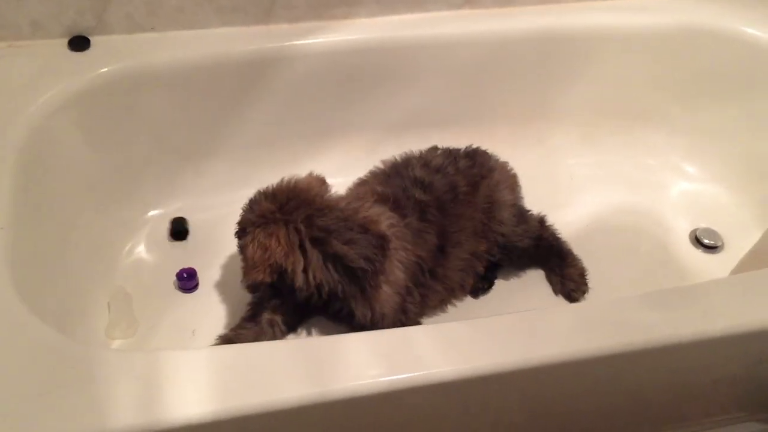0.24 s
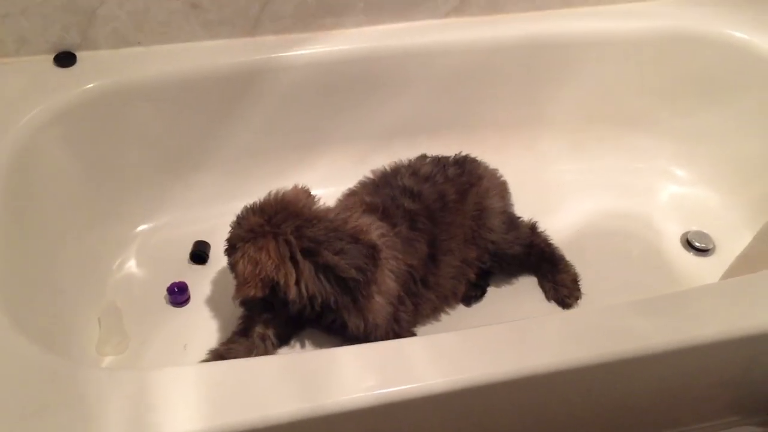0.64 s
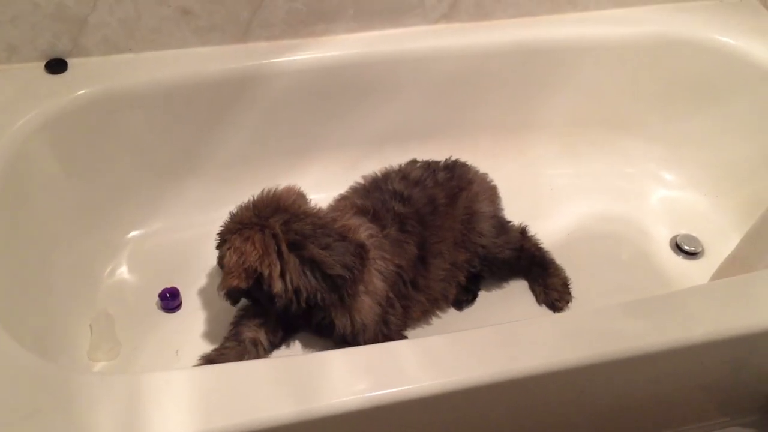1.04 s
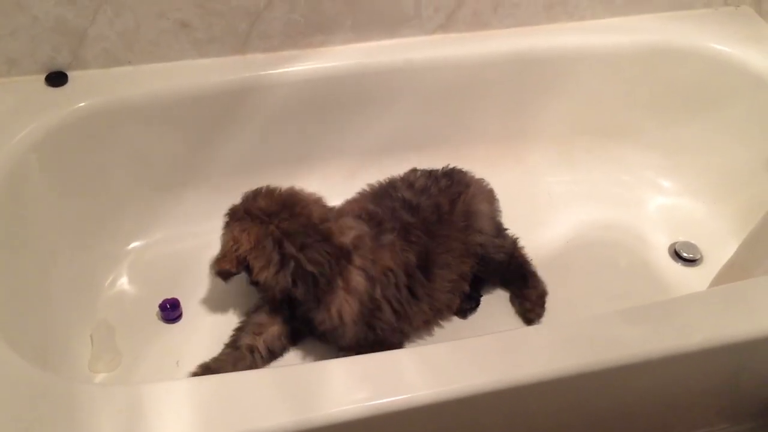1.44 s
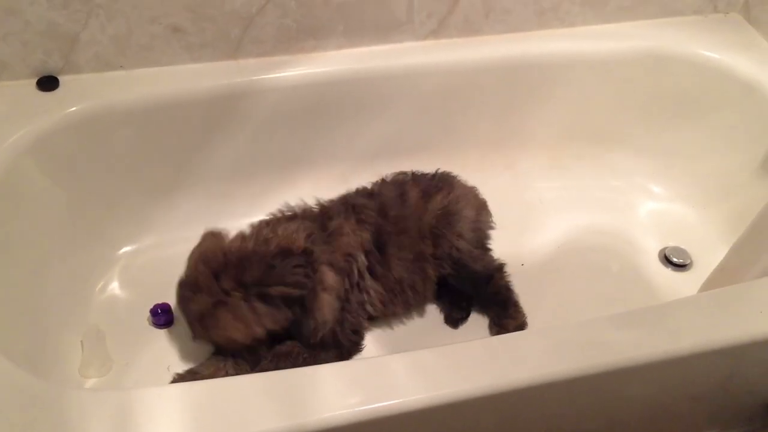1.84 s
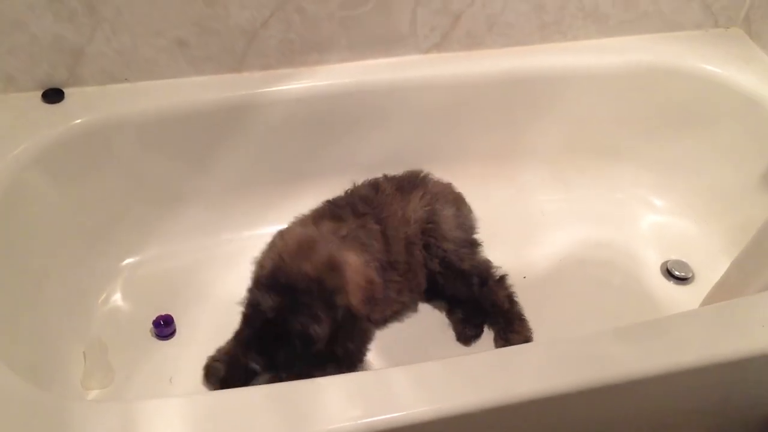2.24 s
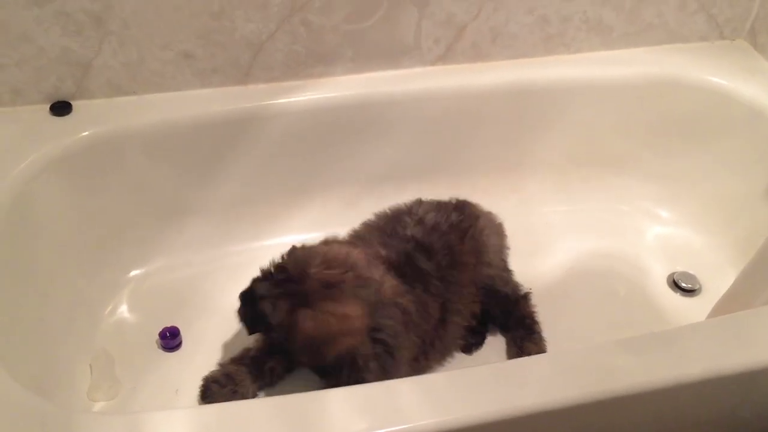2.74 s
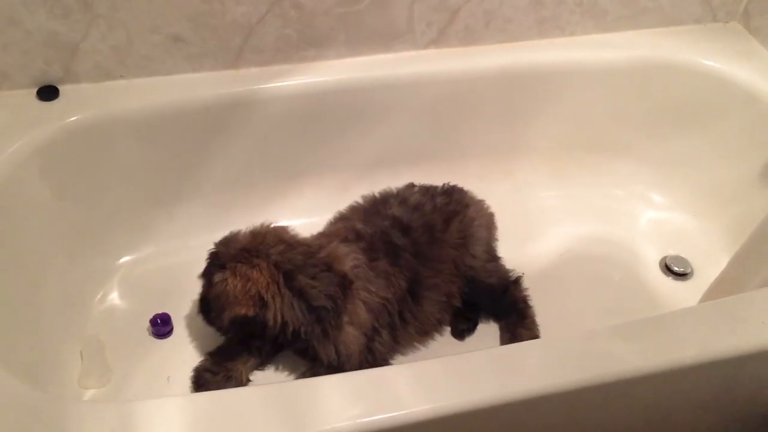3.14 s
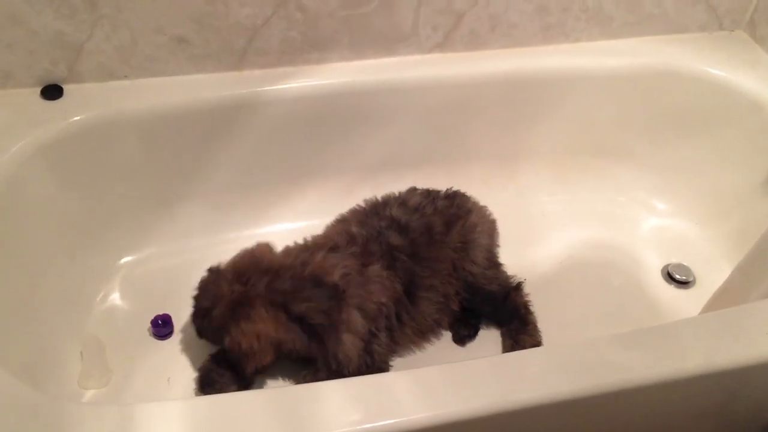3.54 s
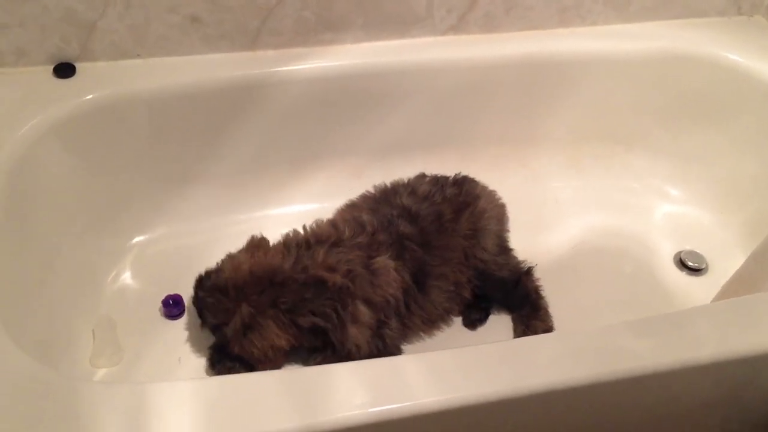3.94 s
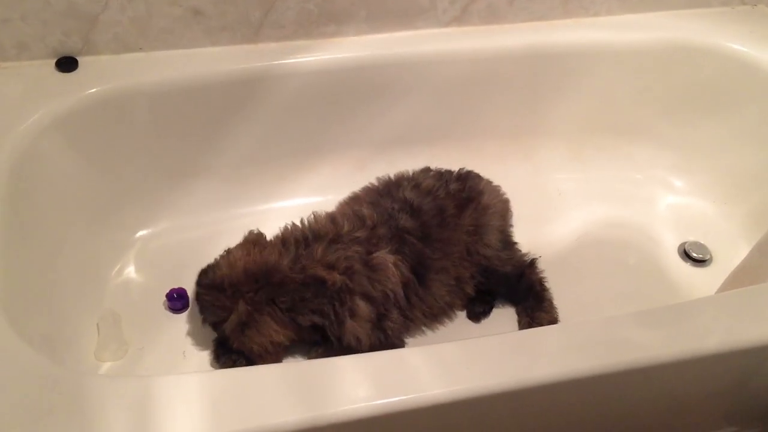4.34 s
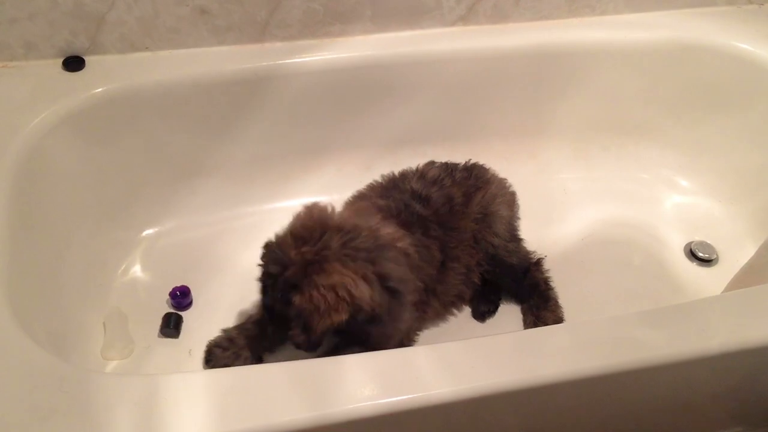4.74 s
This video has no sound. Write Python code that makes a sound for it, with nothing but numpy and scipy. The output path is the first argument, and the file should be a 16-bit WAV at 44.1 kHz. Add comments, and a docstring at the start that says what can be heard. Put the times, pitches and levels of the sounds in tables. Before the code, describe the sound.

A puppy bats little plastic bottles around an empty bathtub. Hard knocks, a quick clink and a short scrape open, then faint rolling and light taps. A stronger hollow knock with paw thuds comes midway, then near quiet, then a sudden loud bright bang with a rattle. Duller irregular knocks follow to the end. Small tiled bathroom, close mono microphone, faint room hiss.

```python
"""Small plastic bottles knock about the floor of an empty bathtub, nosed and pawed by a puppy.
Each knock is two quick touches that ring the tub's shell, and a boom of its hollow floor.
Bottles also clink, roll, skid and clatter: the motion is made of many tiny random contacts.
Paws thud, claws tick and fur brushes the tub. Filtered noise, fading as the tub and the tiled
bathroom do, gives each of them its ring; a faint room noise lies underneath."""
import sys
import numpy as np
from scipy import signal
from scipy.fft import rfft, irfft
from scipy.io import wavfile

SR = 44100
rng = np.random.default_rng(int(sys.argv[2]) if len(sys.argv) > 2 else 0)


def transcribe(signal):
    """Save signal, clipped to [-1, 1], as a 16-bit WAV file at the path in sys.argv[1]."""
    frames = np.atleast_2d(signal).T
    limited = np.clip(frames, -1, 1)
    pcm = np.round(limited * 32767).astype(np.int16)
    wavfile.write(sys.argv[1], SR, pcm)


N = 220544  # length of the scene in samples
SIZE = 32768  # length of one response in samples
AGE = np.arange(SIZE) / SR  # seconds since a blow
BINS = np.fft.rfftfreq(SIZE, 1 / SR) + 1  # frequencies in Hz, moved up by 1 to avoid log of zero

# How long the tub and bathroom ring. Each row: frequency in Hz, time to fall by 60 dB in seconds.
RING = [(100, 0.48), (350, .8), (1000, 0.52), (2000, 0.4), (4000, 0.38), (8000, 0.36), (16000, 0.087)]


def knocks(decay):
    """Every knock booms the floor once and touches the tub twice, the second time weaker and softer."""
    # Bottles hitting the tub, and a few faint, hard ticks of the puppy's claws.
    # Each row: start in seconds, strength in dB, contact corner in Hz (high = hard hit),
    # level of the hollow sound in dB, level of the floor boom in dB.
    knock_rows = [(0, -32.5, 6000, -34.5, -57), (0.2469, -39.5, 8100, -62, -50),
                  (.308, -41.5, 3800, -67, -47.5), (.373, -38, 1260, -50.5, -60),
                  (0.627, -62.5, 885, -73, -81), (0.692, -50.5, 1420, -70, -62),
                  (.824, -45.5, 2130, -68.5, -54), (1.094, -41, 1240, -55, -53),
                  (1.137, -41.5, 1630, -63, -70), (1.187, -44, 1370, -62, -48.5),
                  (1.354, -47, 1200, -85, -56), (1.467, -46, 700, -70, -58), (1.533, -38, 1160, -51.5, -65),
                  (1.562, -41.5, 9300, -62, -40), (1.574, -22, 1580, -37, -23.5),
                  (1.711, -30, 990, -40, -30), (1.775, -32.5, 710, -78, -65),
                  (2.272, -75, 16000, -65, -64.5), (2.35, -74.5, 14100, -80, -73.5),
                  (2.646, -67.5, 10010, -68.5, -89), (2.715, -74, 11130, -68.5, -63),
                  (2.951, -54.5, 3500, -64, -65), (2.9725, -12.5, 8300, -30.5, -25),
                  (3.022, -21, 8500, -43, -44), (3.042, -29.5, 6500, -34.5, -23.5),
                  (3.26, -36, 3770, -50, -47), (3.567, -34.5, 1027, -48.5, -44),
                  (3.595, -35, 1325, -42.5, -37), (3.617, -27, 1050, -42, -66),
                  (3.685, -41.5, 2810, -39, -40.5), (3.812, -32.5, 1130, -47, -41.5),
                  (3.936, -46.5, 1690, -55.5, -76), (3.986, -42, 1580, -54.5, -64),
                  (4.16, -39, 1020, -58.5, -42.5), (4.226, -40.5, 756, -68.5, -49),
                  (4.32, -46.5, 1080, -65, -69), (4.447, -39, 845, -63, -50.5),
                  (4.467, -45, 2130, -51.5, -48.5), (4.56, -32, 1170, -44.5, -46),
                  (4.583, -40, 1090, -47.5, -71), (4.631, -30.5, 9800, -42.5, -33.5),
                  (4.702, -33.5, 7600, -42, -41.5)]
    # Low modes of the hollow tub floor. Each row: frequency in Hz, relative level in dB,
    # time to fall by 60 dB in seconds.
    floor_rows = [(155.05, -4.5, .42), (201.3, -3, 0.31), (297.4, -7.5, 0.082), (345.3, -12.5, 0.3),
                  (379.6, -13, 0.47)]
    # Colours of the shell, the bottle's hollow and the tick. Each row: frequency in Hz, gain in dB.
    shell_colour = [(30, -24.5), (90, -13), (200, 2.5), (400, -1.5), (700, -8.5), (1100, 0), (2200, 3),
                    (3600, 6.5), (5000, -4), (9000, -7), (16000, -38)]
    hollow_colour = [(100, -35), (600, -5), (1000, -10.5), (1600, -4.5), (2400, -5.5), (3400, -13),
                     (4500, -22), (9000, -37.5)]
    tick_colour = [(100, -51), (500, -36), (3000, -3.5), (5000, -2.5), (6200, 7.5), (9500, -1),
                   (11000, -14.5), (16000, -13.5)]
    # Two touches each, as a bottle lands on one end, then on the other.
    rebound_s, rebound_db = .015, -5

    out = np.zeros(N)
    shell_bank = shell_modes()
    floor_bank = modes(floor_rows)
    tones = colour(shell_colour), colour(hollow_colour), colour(tick_colour)
    swell = 1 - np.exp(-AGE / 0.0013)  # the heavy floor takes a moment to move
    for start_s, db, contact_hz, hollow_db, boom_db in knock_rows:
        first = contact(decay, shell_bank, tones, db, contact_hz, hollow_db)
        second = contact(decay, shell_bank, tones, db + rebound_db,
                         0.92 * contact_hz, hollow_db + rebound_db)
        boom = undb(boom_db) * strike(floor_bank, scatter_db=4.0) * swell
        add(out, start_s, first)
        add(out, start_s + rebound_s, second)
        add(out, start_s, boom)
    return out


def contact(decay, shell_bank, tones, db, contact_hz, hollow_db):
    """One touch on the tub: a harder one builds quicker, with a brighter shell and louder tick."""
    soft_contact_hz = 1000
    tick_db, tick_db_per_octave = -51.5, 13.5  # tick level at a soft contact, and its rise with hardness
    push_cycles = 5  # build-up time, in cycles of the contact corner

    shell_tone, hollow_tone, tick_tone = tones
    hardness_octaves = np.log2(contact_hz / soft_contact_hz)
    push = 1 - np.exp(-AGE * contact_hz / push_cycles)
    snap = 1 + 0.73 * np.exp(-AGE / 0.002)  # the tick comes straight from the point of contact
    wash = unit(dense(decay, direct=0.79))
    ring = (wash + undb(-12.5) * strike(shell_bank, scatter_db=3)) * push
    shell = soften(coloured(ring, shell_tone), contact_hz)
    tick_gain = undb(tick_db + tick_db_per_octave * hardness_octaves)
    tick = tick_gain * coloured(wash * snap, tick_tone)
    hollow = undb(hollow_db) * coloured(ring, hollow_tone)
    return undb(db) * (shell + tick) + hollow


def soften(x, corner_hz):
    """A softer contact pushes for longer and loses the treble above its corner."""
    low_pass = signal.butter(N=3, Wn=min(corner_hz, .45 * SR), fs=SR, output="sos")
    return signal.sosfilt(low_pass, x)


def clinks(decay):
    """One bottle meets another: bright modes, spread by the tub walls."""
    # Bottle against bottle. Each row: start in seconds, level in dB.
    clink_rows = [(.0788, -27), (.085, -26)]
    # Modes of a small bottle. Each row: frequency in Hz, relative level in dB,
    # time to fall by 60 dB in seconds.
    bottle_rows = [(2152, 2.5, .12), (2350, -12.5, .17), (2390, -6, .14), (3325, -18, .25),
                   (3278, -6.5, .17), (3390, -4.5, .3), (3505, -5.5, .22), (3890, -2, .2), (5274, -.5, .16)]
    # Colour of the spread sound. Each row: frequency in Hz, gain in dB.
    clink_colour = [(100, -26.5), (1000, -18.5), (1600, -7.5), (2200, 5.5), (2750, -5), (3500, 3),
                    (5500, -8.5), (8000, -19.5), (16000, -37)]

    out = np.zeros(N)
    for start_s, db in clink_rows:
        spread = coloured(dense(decay, direct=0.84), colour(clink_colour))
        bottle = undb(-10) * strike(modes(bottle_rows), scatter_db=1.0)
        add(out, start_s, undb(db) * (spread + bottle))
    return out


def rolling(decay):
    """A rolling bottle's rim bumps the shell gently and often; it is too light to move the floor."""
    # Nudges that set a bottle rolling. Each row: start in seconds, length in seconds, level in dB.
    roll_rows = [(.44, 0.041, -54), (.572, 0.18, -55), (.745, 0.23, -53), (1.07, .2, -54),
                 (1.33, 0.22, -58.5)]
    # Course of a roll: attack in seconds, loss to friction in dB per second, release in seconds.
    roll_motion = (0.004, 15, 0.12)

    ring = unit(dense(decay, direct=0.209)) + undb(-12.5) * strike(shell_modes(), scatter_db=3)
    rumble = colour([(60, -57.0), (200, -12.0), (370, 8.5), (550, -6.5), (1000, -1.5),
                     (1600, -20), (4000, -53.0)])  # Hz, dB
    bumps = grains(effort(roll_rows, roll_motion), rate=280, spread_db=5.5)
    return excite(bumps, coloured(ring, rumble))


def skidding(decay):
    """A skidding or clattering bottle makes quick small contacts that ring the shell and crunch faintly."""
    # Shoves that make a bottle skid, and short bursts of clatter just after hard knocks.
    # Each row: start in seconds, length in seconds, level in dB.
    skid_rows = [(.255, .14, -36.5), (1.1, 0.075, -61.5), (1.66, 0.036, -39.5), (2.995, 0.027, -23.5),
                 (3.595, 0.16, -40), (4.165, .08, -60.5), (4.65, 0.064, -36)]
    # Course of a skid or clatter: attack in seconds, loss in dB per second, release in seconds.
    skid_motion = (0.0029, 30.6, 0.005)

    ring = unit(dense(decay, direct=.3)) + undb(-10) * strike(shell_modes(), scatter_db=3)
    chatter = colour([(60, -50), (300, -9.0), (700, 4), (1200, 8.5), (2200, -2.0), (3700, 2.0),
                      (4900, -26.0), (6600, -11.5), (9500, -38.5), (16000, -25.0)])  # Hz, dB
    touches = grains(effort(skid_rows, skid_motion), rate=700, spread_db=7.5)
    return excite(touches, coloured(ring, chatter))


def paws(decay):
    """The puppy's weight lands on a soft paw and flexes the tub floor in a slow-starting thud."""
    # Each row: start in seconds, thud level in dB.
    paw_rows = [(0.08, -56.5), (0.248, -59), (1.571, -36), (1.712, -31.5), (1.83, -51.5), (2.193, -53.5),
                (2.244, -53), (2.348, -65), (2.578, -53), (3.048, -34.5), (3.825, -47.5)]
    # Colour of the thud. Each row: frequency in Hz, gain in dB.
    thud_colour = [(20, -19), (50, -10.5), (90, 1), (130, 0), (200, -4), (300, -30.5), (1000, -40.5),
                   (4000, -69)]

    out = np.zeros(N)
    press = (1 - np.exp(-AGE / 0.022)) * np.exp(-AGE / 0.13)
    for start_s, db in paw_rows:
        thud = coloured(dense(decay, direct=0) * press, colour(thud_colour))
        add(out, start_s, undb(db) * thud)
    return out


def claws(decay):
    """Hard claws tick on the tub's surface: mostly direct sound, in a narrow treble band."""
    # Each row: start in seconds, level in dB.
    claw_rows = [(1.694, -62.5), (1.763, -48), (1.777, -50.5), (2.275, -64), (2.353, -71.5), (3.785, -68),
                 (3.811, -60.5), (4.45, -78.5), (4.54, -68.5)]
    # Colour of a claw. Each row: frequency in Hz, gain in dB.
    claw_colour = [(100, -56), (3000, -33), (5200, -17), (5900, 1), (6600, -15.5), (9500, -8), (11000, -27),
                   (16000, -21)]

    out = np.zeros(N)
    for start_s, db in claw_rows:
        tick = coloured(dense(decay, direct=2.3), colour(claw_colour))
        add(out, start_s, undb(db) * tick)
    return out


def fur(decay):
    """As the puppy turns, hairs slide over the smooth tub in a soft rustle."""
    # Each row: start in seconds, length in seconds, level in dB.
    brush_rows = [(1.87, .21, -66.5), (2.61, 0.12, -66)]
    # Course of a brush: attack in seconds, loss to friction in dB per second, release in seconds.
    brush_motion = (0.046, 17, 0.021)
    # Colour of brushing fur. Each row: frequency in Hz, gain in dB.
    brush_colour = [(100, -19.5), (800, -2), (2000, -12.5), (4300, -10), (7000, -14.5), (16000, -17.5)]

    hairs = grains(effort(brush_rows, brush_motion), rate=1600, spread_db=4.0)
    return excite(hairs, coloured(dense(decay, direct=0.59), colour(brush_colour)))


def quiet():
    """Faint rumble and hiss of the room: noise filtered to a steady colour."""
    # Colour of the quiet room. Each row: frequency in Hz, relative level in dB per Hz.
    quiet_colour = [(15, -30.5), (25, -12), (42, 2), (97, -4.5), (153, -9), (1130, -20), (2000, -22),
                    (2990, -22.5), (3340, -25), (6920, -27.5), (16000, -36.5)]
    quiet_db = -69.5

    x = shape(rng.standard_normal(N), lambda hz: undb(along(quiet_colour, hz)))
    return undb(quiet_db) * x / np.std(x)


def effort(strokes, motion):
    """Each stroke gets going, loses strength while it lasts, and dies away."""
    attack_s, loss_db_per_s, release_s = motion
    out = np.zeros(N)
    for start_s, length_s, db in strokes:
        attack = 1 - np.exp(-AGE / attack_s)
        release = np.exp(-np.maximum(AGE - length_s, 0) / release_s)
        add(out, start_s, undb(db - loss_db_per_s * AGE) * (attack * release))
    return out


def grains(level, rate, spread_db):
    """Random tiny contacts of uneven size, rate per second, as strong as the motion that makes them."""
    hits = rng.random(N) < rate / SR
    signs = rng.choice([-1, 1], N)
    sizes = undb(spread_db * rng.standard_normal(N))
    x = hits * signs * sizes
    return x / np.std(x) * level


def excite(x, response):
    """Play a force through a response of unit energy, which keeps its power about the same."""
    return signal.fftconvolve(x, response / np.sqrt(np.sum(response ** 2)))[:N]


def fading(late):
    """Octave bands, each with its decay: the tub dies quickly, the room's share stays on."""
    hz = np.clip(BINS, 125, 16000)
    centres = 125 * 2. ** np.arange(8)[:, None]
    bands = np.maximum(0, 1 - abs(np.log2(hz / centres)))
    room = np.exp(-np.log(1000) * AGE / along(RING, centres))
    tub = room ** 2  # fades twice as fast
    return bands, tub + late * room


def dense(decay, direct, direct_s=0.0042):
    """Fading noise for countless modes and reflections, led by a direct crack and its wall echoes."""
    # First reflections off the tub walls. Each row: delay in seconds, gain (a plain factor).
    wall_rows = [(.006, 0.26), (0.015, 0.29)]

    bands, envelopes = decay
    noise = irfft(rfft(rng.standard_normal(SIZE)) * bands)
    tail = np.sum(noise * envelopes, axis=0)
    crack = np.exp(-AGE / direct_s)
    for lag_s, gain in wall_rows:
        crack = crack + gain * (AGE > lag_s) * np.exp(-abs(AGE - lag_s) / direct_s)
    return tail * (1 + direct * crack)


def shell_modes():
    """The shell's clear modes die a little before the room does."""
    # Modes that stand out of the dense ringing. Each row: frequency in Hz, relative level in dB.
    shell_rows = [(356, -3), (614, 0), (657, -3), (743, -2), (915, -5), (1017, 3), (1157, -4), (1249, -3),
                  (1346, -2), (1423, 0), (1509, 1), (1927, 2), (2331, 5), (2893, 3), (3097, 0), (3227, 0),
                  (3409, 0), (3630, 0), (4020, 0), (4495, 0)]
    return modes([(hz, db, .66 * along(RING, hz)) for hz, db in shell_rows])


def modes(table):
    """One decaying sine for each row: frequency in Hz, level in dB, time to fall by 60 dB in seconds."""
    hz, db, t60 = np.transpose(table)[:, :, None]
    sign = (-1) ** np.arange(len(hz))[:, None]
    fade = np.exp(-np.log(1000) * AGE / t60)
    return sign * undb(db) * fade * np.sin(2 * np.pi * hz * AGE)


def strike(bank, scatter_db):
    """Sum the modes at random strengths, since each depends on the spot that is struck."""
    strengths = undb(scatter_db * rng.standard_normal((len(bank), 1)))
    return unit(np.sum(strengths * bank, axis=0))


def colour(points):
    """A filter through (Hz, dB) points."""
    return causal(undb(along(points, BINS)))


def causal(gain):
    """The spectrum of a filter with this gain in which nothing sounds before the blow."""
    cepstrum = irfft(np.log(gain + 1e-9))
    # Fold the backward half of time onto the forward half.
    cepstrum[1:SIZE // 2] *= 2
    cepstrum[SIZE // 2 + 1:] = 0
    return np.exp(rfft(cepstrum))


def coloured(x, spectrum):
    """Filter a response and bring it to unit level."""
    return unit(irfft(rfft(x) * spectrum))


def unit(x):
    """Scale a response to rms 1 over its first 50 ms."""
    return x / np.sqrt(np.mean(x[:SR // 20] ** 2))


def shape(x, gain):
    """Filter x by a gain that is a function of frequency."""
    hz = np.fft.rfftfreq(len(x), 1 / SR) + 1
    return irfft(rfft(x) * gain(hz), len(x))


def along(points, hz):
    """Read (Hz, value) points on a log-frequency axis."""
    f, value = np.transpose(points)
    return np.interp(np.log(hz), np.log(f), value)


def undb(db):
    """Decibels to gain."""
    return 10 ** (np.asarray(db) / 20)


def add(out, s, x):
    """Mix x into out from time s in seconds."""
    i = max(0, int(s * SR))
    out[i:i + len(x)] += x[:max(0, N - i)]


def scene():
    """Every bottle, paw, claw and brush of fur rings in the same tub and room."""
    decay = fading(late=.18)
    hits = knocks(decay) + clinks(decay)
    motions = rolling(decay) + skidding(decay)
    puppy = paws(decay) + claws(decay) + fur(decay)
    return (hits + motions + puppy + quiet())[None]


def record(dry):
    """The microphone rounds the loudest peaks; the top is cut."""
    ceiling, top_hz = .78, 15900
    rounded = ceiling * np.tanh(dry / ceiling)
    return signal.sosfilt(signal.ellip(8, .2, 70, top_hz, fs=SR, output="sos"), rounded)


dry = scene()
out = record(dry)
transcribe(out)
```